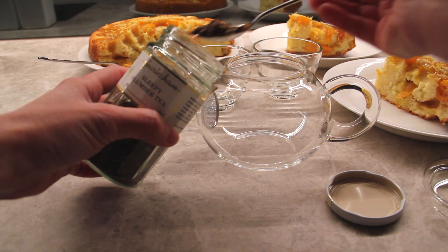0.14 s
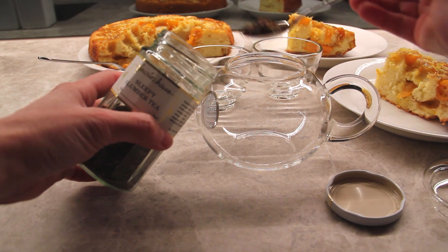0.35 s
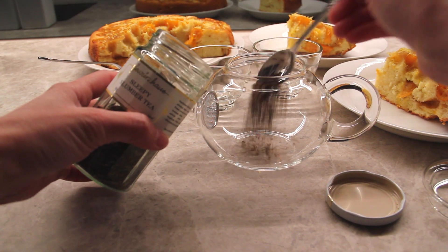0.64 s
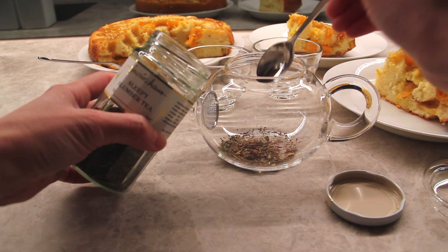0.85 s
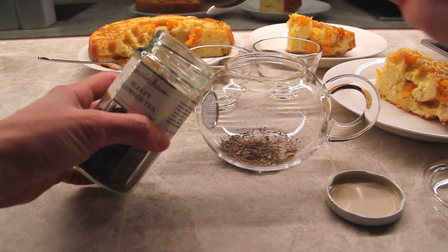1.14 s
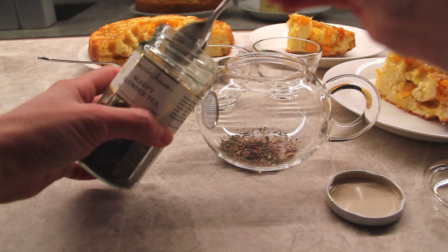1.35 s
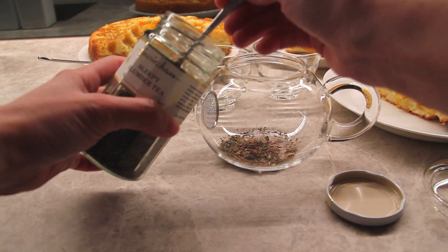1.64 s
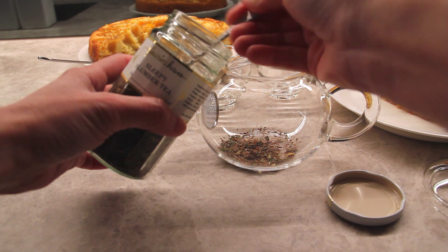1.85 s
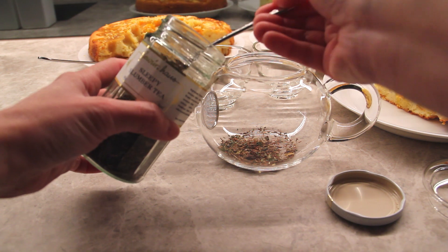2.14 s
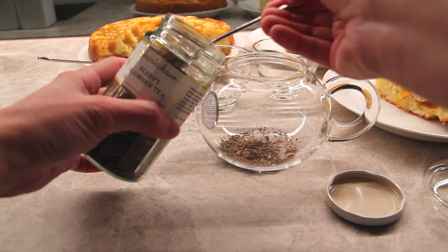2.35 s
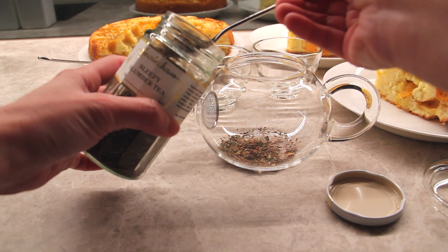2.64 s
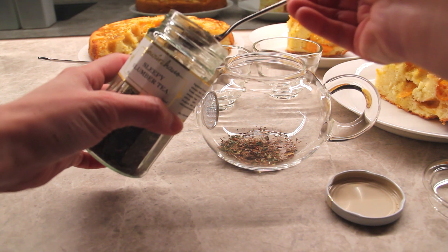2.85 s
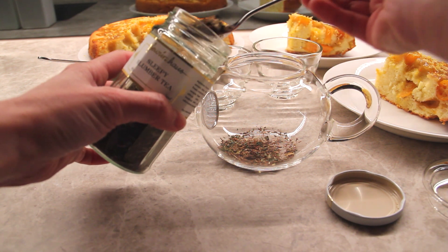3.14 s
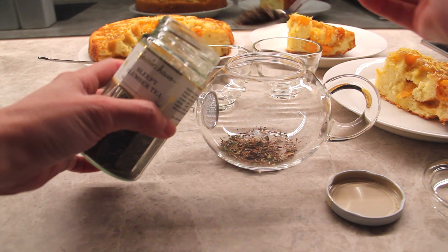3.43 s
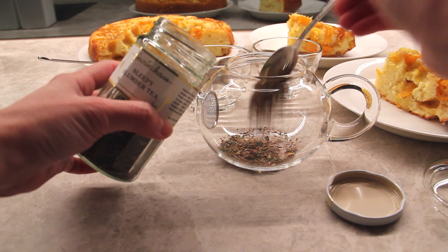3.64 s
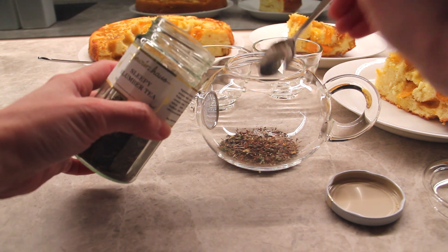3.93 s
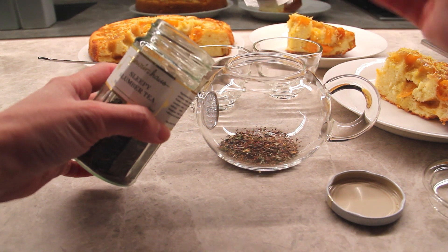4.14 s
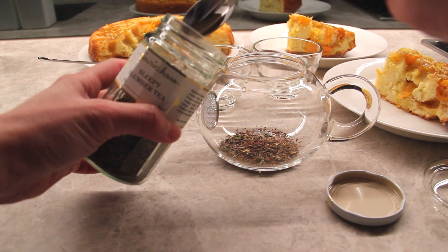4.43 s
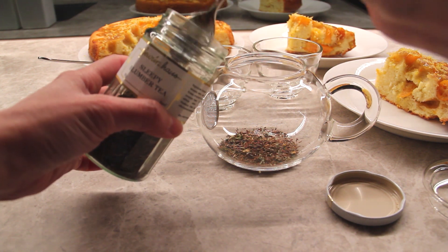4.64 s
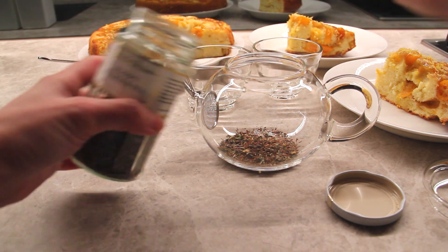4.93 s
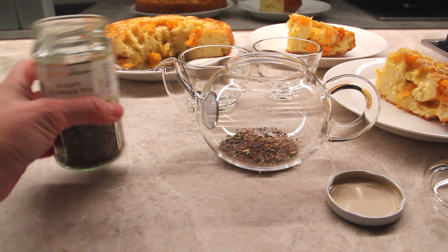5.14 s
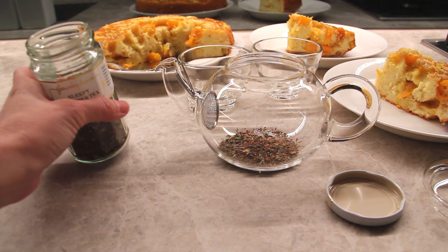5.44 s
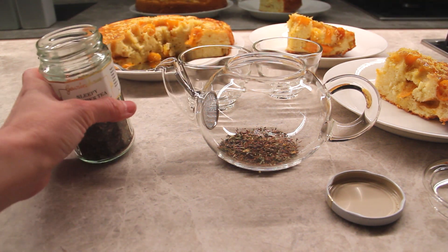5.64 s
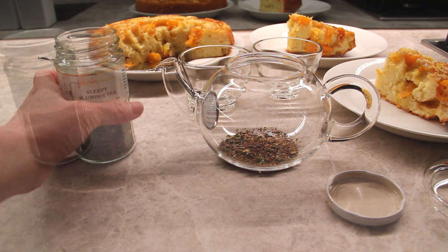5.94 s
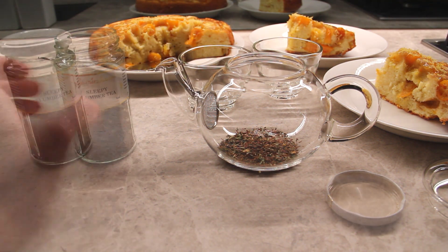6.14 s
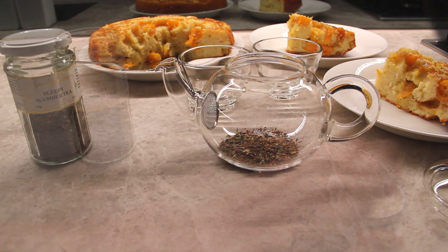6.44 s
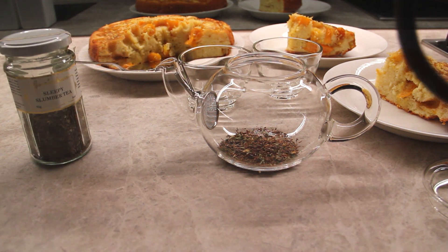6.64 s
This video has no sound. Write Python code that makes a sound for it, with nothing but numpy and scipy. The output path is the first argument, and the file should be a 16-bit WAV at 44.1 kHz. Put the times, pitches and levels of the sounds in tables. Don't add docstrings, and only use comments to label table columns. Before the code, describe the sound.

In a humming kitchen, loose tea is scooped and poured into thin glass with bright tinkles, before a glass jar bangs onto stone.

```python
import sys
import numpy as np
from scipy import signal
from scipy.fft import rfft, irfft, next_fast_len
from scipy.io import wavfile
from scipy.ndimage import uniform_filter1d

SR = 44100
rng = np.random.default_rng(int(sys.argv[2]) if len(sys.argv) > 2 else 0)


def how_loud(loudness_db):
    steps = np.asarray(loudness_db, float) / 20
    return 10 ** steps


def persist_wave(psi):
    counts = np.round(np.clip(psi, -1, 1) * 32767).astype(np.int16)
    wavfile.write(sys.argv[1], SR, np.atleast_2d(counts).T)


N = 299835

# t/s, effort/dB, depth/0-1
DIG = [
    [(1.526, -60.5, .3), (1.538, -48.5, 0.1), (1.56, -48.5, 0.2), (1.64, -49, 0.7), (1.696, -48.5, 1),
     (1.76, -48.5, 0.93), (1.82, -47.5, 0.96), (1.88, -47, 0.5), (1.956, -47.5, 0.53), (1.998, -57.5, .1),
     (2.056, -58, 0.48)],
    [(2.056, -56, .6), (2.218, -56.5, 0.4), (2.224, -53, 0.5), (2.268, -63, .4), (2.302, -58, .3),
     (2.374, -67, 0.3), (2.39, -59, 0.2), (2.454, -71.5, .4)],
    [(5.1, -65.5, 0.64), (5.258, -51.5, 0.73), (5.272, -48, 0.6), (5.302, -51, 0.4), (5.432, -63, 0.6),
     (5.48, -68, .6)],
]


def unit(x):
    return x / np.sqrt(np.mean(x ** 2) + 1e-20)


def along(points, hz):
    f, v = np.transpose(points)
    return np.interp(np.log(hz + 1), np.log(f + 1), v)


def curves(*spans):
    t = np.arange(N) / SR
    parts = []
    for span in spans:
        s, *columns = np.transpose(span)
        parts.append([np.interp(t, s, column, -150, -150) for column in columns])
    return np.max(parts, axis=0)


def wobble(rate, count=N):
    return np.interp(np.arange(count) * rate / SR, np.arange(1500), rng.standard_normal(1500))


def coloured(x, spectrum):
    size = next_fast_len(N + 8192)
    gain = how_loud(along(spectrum, np.fft.rfftfreq(size, 1 / SR)))
    return unit(irfft(rfft(x, size) * gain, size)[:N])


def patter(per_second, spread_db):
    chance, size = rng.random(N), rng.exponential(size=N)
    return unit((chance < per_second / SR) * how_loud(spread_db * size))


def spikes(times, levels_db):
    x = np.zeros(N)
    x[np.round(np.asarray(times) * SR).astype(int)] = how_loud(levels_db)
    return x


def puffs(times, levels_db, t60):
    t = np.arange(SR // 5) / SR
    shape = how_loud(-60 * t / t60) * (1 - np.exp(-t / 0.00057))
    return np.abs(signal.fftconvolve(spikes(times, levels_db), shape)[:N])


def ring(force, hz, width_hz):
    r = np.exp(-np.pi * width_hz / SR)
    w = 2 * np.pi * hz / SR
    return signal.lfilter([np.sqrt(2 * (1 - r * r)) * np.sin(w)], [1, -2 * r * np.cos(w), r * r], force)


def glass(modes, forces, splits_hz, contact_hz=300, wander_db=0):
    live = np.flatnonzero(uniform_filter1d(forces[0][0], size=SR // 2) > 1e-6)[:3 * SR]
    out = np.zeros(N)
    power = sum(how_loud(db) ** 2 * width for _, width, db in modes)
    total = np.sqrt(power * SR / (np.pi * contact_hz))
    for hz, width, db in modes:
        rain, blows = forces[np.searchsorted(splits_hz, hz)]
        luck = rng.standard_normal(3 * SR)[:len(live)]
        wander = how_loud(wander_db * wobble(10.3, count=len(live)))
        force = rain[live] * wander * luck + blows[live] * (1 + 0.32 * luck)
        soft = ring(force, hz, contact_hz)
        out[live] += how_loud(db) * np.sqrt(width) / total * ring(soft, hz, width)
    return out


def decay(spectrum, build_s):
    # f/Hz, t60/s
    kitchen = [(200, 0.57), (700, 0.65), (2000, 0.59), (4000, 0.55), (10000, 0.37)]
    hz, t, z = signal.stft(rng.standard_normal(SR), SR, nperseg=256)
    fall_db = 60 * t / along(kitchen, hz)[:, None]
    gain = how_loud(along(spectrum, hz)[:, None] - fall_db) * (1 - np.exp(-t / build_s))
    return signal.istft(z * gain, SR, nperseg=256)[1][:SR]


def room(x):
    tail = decay([(100, 0), (9000, 0.0073)], build_s=0.0062)
    return signal.fftconvolve(x, tail / np.linalg.norm(tail))[:len(x)]


def background():
    # f/Hz, level/dB per Hz
    hum = [(12, -47), (20, -5), (22, -35), (32, -17), (59, -26), (98, -12), (141, -22.5), (214, -13),
           (316, -14.5), (353, -20), (405, -13.5), (566, -22), (814, -26), (2700, -36), (15600, -40.5)]
    # f/Hz, level/dB per Hz
    hiss = [(24, -39), (40, -5), (69, -3), (143, -7), (273, -3), (498, -2), (1690, -3.5), (15600, -4)]
    swell = how_loud(0.25 * wobble(4.25))
    mid = how_loud(-42) * coloured(rng.standard_normal(N), hum) * swell
    side = how_loud(-54.0) * coloured(rng.standard_normal(N), hiss)
    return np.array([mid + side, mid - side])


def teapot():
    # t/s, flow/dB
    flow = [
        [(0.562, -32), (0.582, -45), (0.596, -34), (0.616, -42), (0.652, -27), (0.688, -30.5), (0.858, -60.5),
         (0.9, -72)],
        [(3.706, -27), (3.738, -36), (3.774, -35), (3.88, -63)],
    ]
    # t/s, level/dB, loss/dB per s
    bare = [
        (0.557, 13.5, 40.5),
        (3.7, 0, 10),
    ]
    # t/s, peak/dB, middle modes/dB, top modes/dB
    pieces = [(0.5562, 0, -10, -1), (0.5918, -25.5, 2.5, -3), (0.597, -24, -17, -8),
              (0.6234, -16.5, -2, -7), (0.6375, -11, -13, -3), (0.642, -15, -12, -3), (0.6509, -12.5, 4, 0),
              (0.6539, -2, -9, -1), (0.6744, -24, -19, -3), (0.691, -24, -10, -6), (0.7244, -22, -5, -6),
              (3.695, -26, -10, -4), (3.7034, -13.5, -15, 3), (3.7117, -29, -14, -3), (3.72, -22, -14, -3),
              (3.7273, -29, 6, -11), (3.7444, -34, 6, -11), (3.755, -34, 1, -8), (3.779, -33, -5, -8),
              (3.8295, -32, -16, -15)]
    # f/Hz, width/Hz, level/dB
    teapot_modes = [(1430, 36, -22), (1970, 56, -21), (4835, 58, -4.5), (4950, 150, -11), (5070, 32, -11),
                    (6200, 31, -22), (6990, 150, -24), (7760, 95, -19), (7970, 42, -17), (8230, 27, -14),
                    (8436, 36, -4), (8470, 210, -4), (8515, 36, -6), (8760, 90, -15), (8990, 30, -10),
                    (9150, 25, -12), (9238, 18, -2), (9700, 60, -14), (9830, 60, -16), (10842, 11, -4.5),
                    (11100, 26, -20), (11200, 34, -22), (11585, 20, -12), (11900, 36, -13),
                    (12700, 48, -17), (13000, 60, -18), (13500, 39, -18), (13900, 160, -18),
                    (14300, 71, -15), (14800, 100, -21), (15100, 20, -19), (15300, 120, -15),
                    (15500, 32, -19),
                    (2580, 300, -29.0), (3980, 420, -22.5), (5700, 60, -28), (11950, 40, -15)]
    # f/Hz, level/dB per Hz
    leaf = [(530, -26), (900, -16.5), (4100, -18), (4920, -1.5), (5350, -18), (8660, -3), (9800, -1),
            (10400, -11), (11500, -9), (13000, -6), (16000, -17)]
    # f/Hz, level/dB per Hz
    dull = [(410, -29), (700, -2), (895, -3), (1330, -7), (1760, 2.5), (2040, -4), (2750, -24), (3860, -3),
            (4400, -4), (5720, -32), (9680, -120)]

    rustle_db, = curves(*flow)
    t = np.arange(N) / SR
    ring_db = rustle_db + sum((db - loss * (t - s)) * (abs(t - s) < 1) for s, db, loss in bare)
    s, db, middle_db, top_hit_db = np.transpose(pieces)
    dull_db = -31 + 0.92 * db
    top_db = -19 + 0.27 * db + top_hit_db
    s = s + 0.00055

    rain = how_loud(ring_db - 7) * patter(2200, spread_db=2.5)
    forces = [
        (rain * how_loud(3.5), spikes(s, dull_db + 42.5)),
        (rain * how_loud(-10 + 5), spikes(s, db + middle_db + 22.0)),
        (rain, spikes(s, db + 13.5)),
        (rain * how_loud(3.5), spikes(s, top_db + 30)),
    ]
    bell = glass(teapot_modes, forces, [4300, 6900, 10300], wander_db=5.0)

    grains = patter(20000, spread_db=1.0) * rng.standard_normal(N)
    leaves = coloured(grains, leaf) * how_loud(2.2 * wobble(150))
    rustle = (how_loud(rustle_db - 2.0) + puffs(s, top_db - 16, 0.042)) * leaves
    thud = puffs(s, dull_db - 2.5, 0.061) * coloured(rng.standard_normal(N), dull)
    return bell + rustle + thud


def spoon():
    # f/Hz, width/Hz, level/dB
    handle_modes = [(8670, 190, 8), (13450, 90, -10)]
    # f/Hz, width/Hz, level/dB
    bowl_modes = [(6510, 37, 0)]
    start_s, end_s = 1.52, 2.02
    t = np.arange(N) / SR - start_s
    effort = how_loud(curves(*DIG)[0]) * (t > 0) * (t < end_s - start_s)
    rub, still = effort * patter(1200, spread_db=1.5), np.zeros(N)
    handle = glass(handle_modes, [(how_loud(-1 - 40 * t) * rub, still)], [], wander_db=-4)
    bowl = glass(bowl_modes, [(how_loud(-17 + 27 * t) * rub, still)], [])
    return handle + bowl


def jar():
    # t/s, lowest mode/dB, upper modes and leaf puff/dB
    ticks = [(1.5361, -50, -46), (1.552, -41, -42), (1.603, -43, -38), (1.6626, -47, -39),
             (1.6794, -46, -43), (1.7362, -58, -58), (1.787, -46, -54), (1.81, -46, -45), (1.829, -38, -38),
             (1.8873, -36, -56), (1.9194, -40, -52), (1.94, -40, -56), (1.9594, -39, -54),
             (1.9996, -39, -51), (2.014, -41, -56), (2.113, -55, -40), (2.19, -46, -40), (2.2236, -41, -47),
             (2.2879, -44, -46), (2.2996, -48, -40), (2.337, -42, -41), (2.392, -45, -44),
             (5.243, -51.5, -42), (5.2742, -21, -44), (5.2887, -46, -48), (5.3597, -52, -56),
             (5.4156, -40, -54)]
    # f/Hz, width/Hz, level/dB
    jar_modes = [(4126, 43, 4), (5070, 35, -13), (5300, 50, -13), (7450, 330, -1), (11200, 86, -24),
                 (12450, 200, -3), (13100, 150, -8), (15200, 70, -12)]
    # f/Hz, level/dB per Hz
    slide = [(1470, -46), (2500, -9), (4020, -2.5), (7420, -1), (10000, -5.5), (13200, -4.5), (16000, -8.5)]
    # f/Hz, level/dB per Hz
    crunch_colour = [(250, -44), (500, 3), (620, 8), (760, 6), (950, -7), (1450, 2), (2500, -11),
                     (4000, -30)]

    rustle_db, depth = curves(*DIG)
    depth = np.clip(depth, 0, 1)
    ring_db = rustle_db + 4 - 13 * depth
    crunch_db = rustle_db - 12 + 15 * depth

    s, db, upper_db = np.transpose(ticks)
    rain = how_loud(ring_db + 2.5) * patter(1500, spread_db=1.5)
    forces = [(rain, spikes(s, db + 20.5)), (how_loud(-2.0) * rain, spikes(s, upper_db + 15.0))]
    bell = glass(jar_modes, forces, [5000], contact_hz=700, wander_db=2.5)

    grains = patter(15000, spread_db=1.0) * rng.standard_normal(N)
    rustle = coloured(grains, slide) * how_loud(1.7 * wobble(60))
    rustle_level = how_loud(rustle_db + 0.5) + puffs(s, upper_db - 9.5, 0.075)
    breaks = patter(3000, spread_db=-0.5) * rng.standard_normal(N)
    crunch = coloured(breaks, crunch_colour) * how_loud(0.8 * wobble(39.8))
    return bell + rustle_level * rustle + how_loud(crunch_db) * crunch


def bumps():
    # t/s, peak/dB, f/Hz, t60/s, noisiness/0-1
    contacts = [(1.678, -13.5, 890, 0.0048, 0.9), (1.6775, -27, 520, 0.015, 0.1),
                (1.745, -34, 775, 0.05, 0.4), (1.797, -33, 540, 0.04, 0.2), (3.771, -14, 170, 0.019, 0.1),
                (3.7763, -18, 338, 0.017, 0.4), (3.792, -33, 220, .03, 0), (5.77, -11.5, 646, 0.038, 0.26),
                (5.858, -16, 715, 0.022, 0), (5.859, -16, 1500, 0.008, 0.1), (5.8757, -7, 785, 0.011, 0),
                (5.543, 9.5, 750, 0.012, 0), (5.8803, 3, 720, 0.021, 0.03), (5.8861, 4, 1336, 0.022, 0),
                (5.8887, -2.5, 520, 0.022, 0), (6.376, -32, 1070, 0.13, 0.52),
                (6.399, -31, 1040, .05, 0.24), (6.379, -38, 1950, 0.062, 0.5),
                (6.6141, -19.5, 129, 0.12, 0.16), (6.617, -26, 290, 0.21, 0.66),
                (6.641, -23, 104, 0.17, 0.03), (6.664, -22.5, 124, 0.052, 0.4), (6.74, -39.5, 910, 0.26, 0),
                (6.795, -27.5, 260, 0.053, 0)]
    x, t = np.zeros(N + SR), np.arange(SR // 4) / SR
    for s, db, hz, t60, noisy in contacts:
        blur = unit(ring(rng.standard_normal(len(t)), hz, hz))
        tone = (1 - noisy) * np.sin(2 * np.pi * hz * t) + noisy * blur
        x[round(s * SR):][:len(t)] += how_loud(db - 60 * t / t60) * (1 - np.exp(-t / 0.00087)) * tone
    return x[:N]


def set_down(hit, modes, chime, air, longest_s=0.083):
    s, db, rattle_db, room_db, slam_db, slam_hz = hit
    x, t = np.zeros(N + SR), np.arange(SR) / SR
    damped = [(hz, level, min(t60, longest_s)) for hz, level, t60 in modes]
    body = np.zeros(SR)
    for k, (hz, level, t60) in enumerate(damped + chime):
        body += how_loud(level - 60 * t / t60) * np.sin(2 * np.pi * hz * t) * (-1) ** k
    turns = slam_hz * (0.528 * t + 0.001554 * (1 - np.exp(-t / 0.003)))
    slam = how_loud(slam_db - 60 * t / 0.0079) * np.sin(2 * np.pi * turns)
    rattle = how_loud(rattle_db - 60 * t / 0.11) * coloured(rng.standard_normal(N), air)[:SR]
    tail = how_loud(room_db - 11.0) * unit(decay(air, build_s=0.052))
    contact = (how_loud(db) * body + rattle) * (1 - np.exp(-t / 0.00028))
    x[round(s * SR):][:SR] = contact + slam + tail + how_loud(db - 22.0) * room(body)
    return x[:N]


def jar_lands():
    # t/s, force/dB, rattle/dB, room/dB, slam/dB, slam f/Hz
    edge = (5.5421, 2.5, 0, -21.5, 13.5, 1454)
    flat = (5.8792, -4, -2, -24.5, 6.5, 1509)
    # f/Hz, level/dB, t60/s
    edge_modes = [(367, -15, 0.024), (557, -10, 0.06), (616, -10, 0.061), (734, -2.5, 0.092),
                  (852, -3, 0.056), (918, 0, 0.045), (1525, -6, 0.11), (1927, -1, 0.053), (1983, -7, 0.055),
                  (2200, -16, 0.09), (2570, -6, 0.034), (3040, -15, 0.065), (3260, -23, 0.015),
                  (3740, -16, 0.025), (4130, -15, 0.065), (4900, -37, 0.06), (6220, -18, 0.015),
                  (6700, -28, 0.05), (7500, -52, 0.1), (12900, -44, 0.07)]
    flat_modes = [(290, -13.5, 0.065), (484, -16, 0.073), (680, -5.5, 0.051), (867, 6.5, 0.024),
                  (1040, 6, 0.0061), (1353, -4, 0.062), (1610, -10, 0.047), (1904, -5, 0.071),
                  (2300, -31, 0.048), (3090, -15, 0.11), (3300, -39, 0.085), (4000, -38, 0.13),
                  (5136, -53, 0.07), (6930, -13, 0.036), (7600, -45, 0.074), (12600, -12, 0.028),
                  (12800, -24, 0.28)]
    # f/Hz, level/dB, t60/s
    edge_glass = [(622, -35, 0.6), (720, -37, 0.43), (1250, -31, 1), (1840, -36, 0.5), (1840, -34, 0.46),
                  (4030, -43, 0.45), (4150, -38.5, 0.41), (6460, -43, 0.3), (13000, -48, 0.1)]
    flat_glass = [(630, -17.5, 0.54), (685, -24, 0.83), (960, -21.5, 0.59), (1335, -30, 0.5),
                  (1650, -35, 0.43), (3082, -31, 0.25), (6760, -36, 0.22), (13100, -30, .12)]
    # f/Hz, level/dB per Hz
    edge_air = [(120, -52), (200, -19.5), (382, -11), (413, -18), (627, -2), (677, -4.5), (731, -10),
                (1080, -10.5), (1960, -8), (3200, -19), (3700, -26), (8000, -43), (10400, -81),
                (17600, -120)]
    flat_air = [(120, -59), (200, -50), (281, -5.5), (580, -16.5), (646, -7), (743, -9.5), (1150, -13),
                (1260, -15), (1350, -12), (1680, -11), (2100, -19.5), (2350, -27.5), (6860, -48.5),
                (8000, -52), (10400, -75), (17600, -120)]
    hits = set_down(edge, edge_modes, edge_glass, edge_air)
    hits = hits + set_down(flat, flat_modes, flat_glass, flat_air)
    return signal.lfilter(*signal.butter(2, 170 / SR * 2, "high"), hits)


def sleeve():
    # t/s, level/dB
    landings = [
        (6.365, -54),
        (6.595, -50),
    ]
    # f/Hz, level/dB per Hz
    cloth = [(240, -35), (400, -12), (572, -12), (907, -5.5), (1150, -7.5), (1850, -9), (14000, -29.5)]
    level = np.zeros(N)
    for s, db in landings:
        since = np.maximum(np.arange(N) / SR - s, 0)
        level += np.minimum(since / .015, 1) * how_loud(db + 4.5 * np.exp(-since / 0.065))
    grains = patter(4000, spread_db=0.0) * rng.standard_normal(N)
    return level * how_loud(3.0) * coloured(grains, cloth)


def scene():
    near = teapot() + jar() + spoon() + bumps()
    return near + how_loud(-14.0) * room(near) + jar_lands() + sleeve() + background()


def roll_off(x):
    return signal.sosfilt(signal.butter(12, 16820, fs=SR, output="sos"), x)


def record(dry):
    # t/s, depth/dB, attack/s, release/s
    duck = [
        (5.543, 12, 0.0033, 0.095),
        (5.88, 7.5, 0.004, 0.074),
    ]
    offset = [
        [-.0307],
        [-.0196],
    ]
    t = np.arange(N) / SR
    cut_db, drift = np.zeros(N), np.ones(N)
    for (s, depth_db, attack, release), swing in zip(duck, [.65, .9]):
        since = np.maximum(t - s, 0)
        cut_db += depth_db * (1 - np.exp(-since / attack)) * np.exp(-since / release)
        rebound = np.exp(-since / 0.47) * (0.99 + 0.14 * np.sin(2 * np.pi * 7.5 * since))
        dip = (1 + 0.99) * np.exp(-since / 0.16)
        drift += swing * (1 - np.exp(-since / 0.009)) * (rebound - dip)
    top_hz = 15800
    dry = irfft(rfft(dry) * (np.fft.rfftfreq(N, 1 / SR) < top_hz), N)
    x = dry * how_loud(-cut_db) + np.array(offset) * drift
    x = x / (1 + np.abs(x) ** 20) ** (1 / 20)
    return roll_off(x)


dry = scene()
out = record(dry)
persist_wave(out)
```